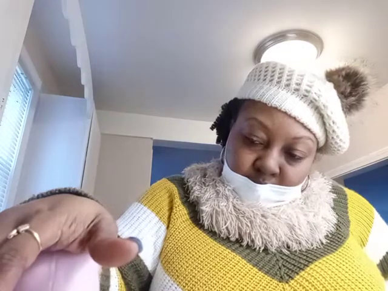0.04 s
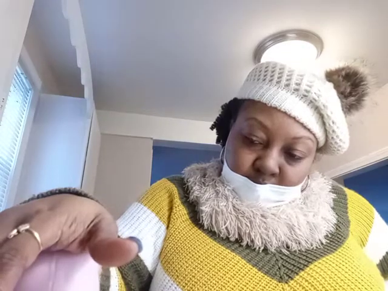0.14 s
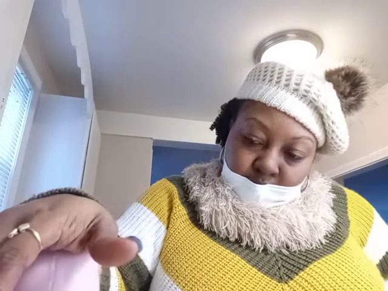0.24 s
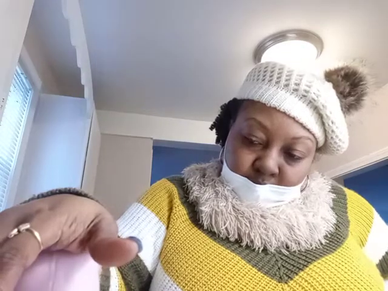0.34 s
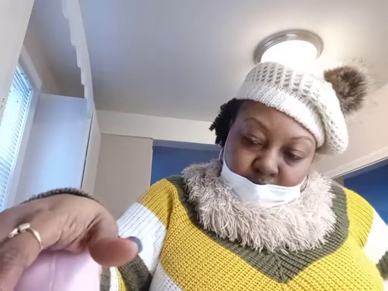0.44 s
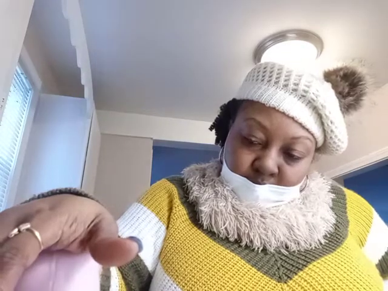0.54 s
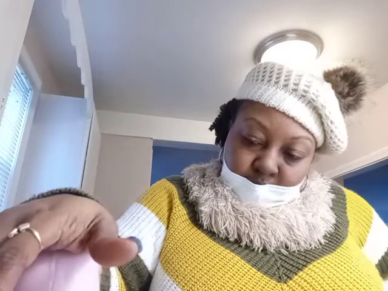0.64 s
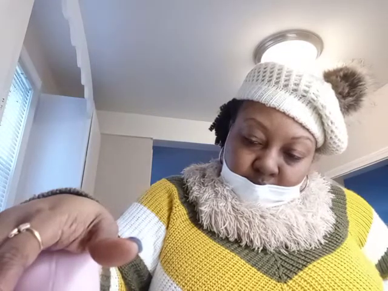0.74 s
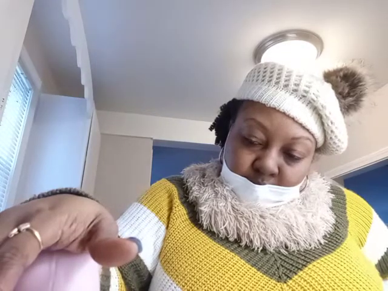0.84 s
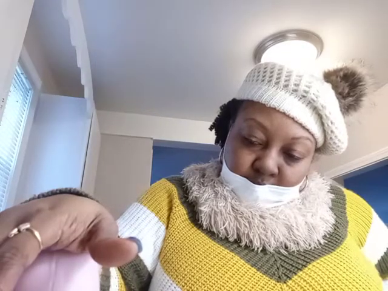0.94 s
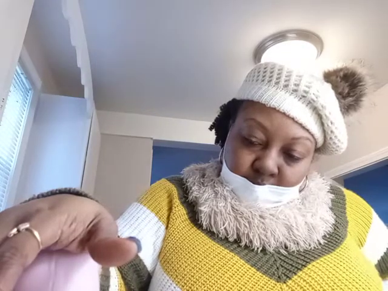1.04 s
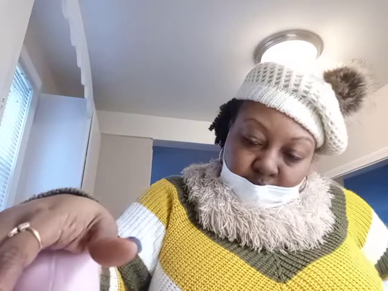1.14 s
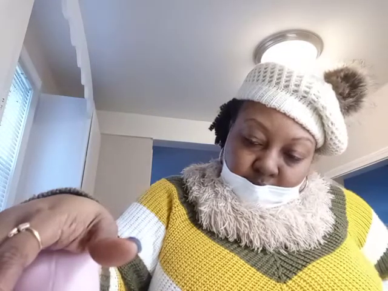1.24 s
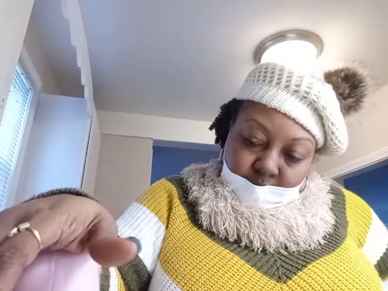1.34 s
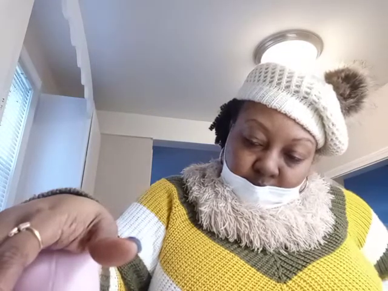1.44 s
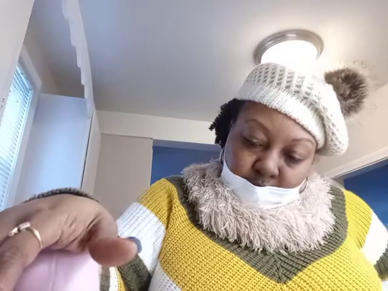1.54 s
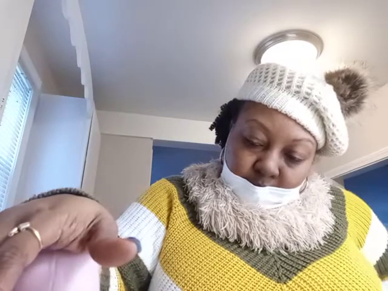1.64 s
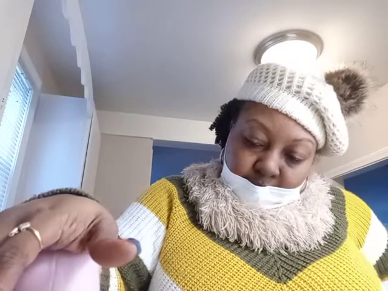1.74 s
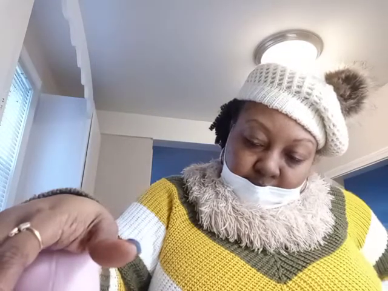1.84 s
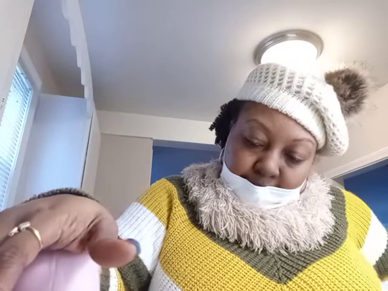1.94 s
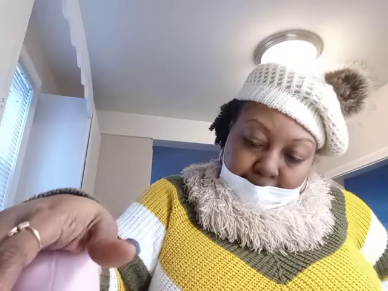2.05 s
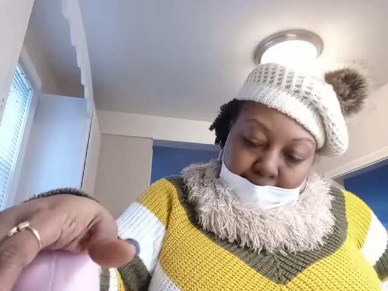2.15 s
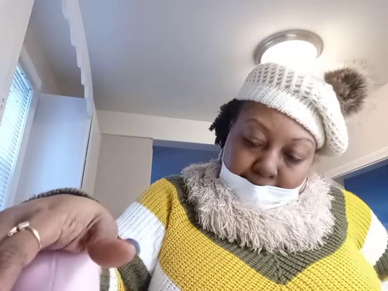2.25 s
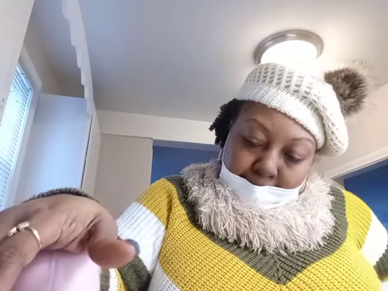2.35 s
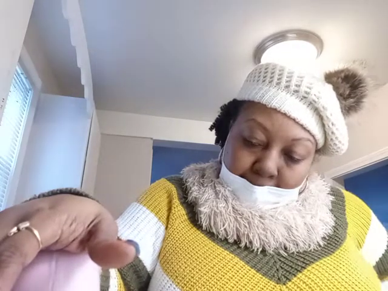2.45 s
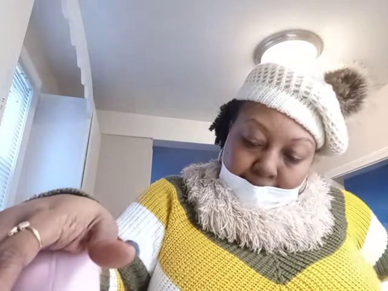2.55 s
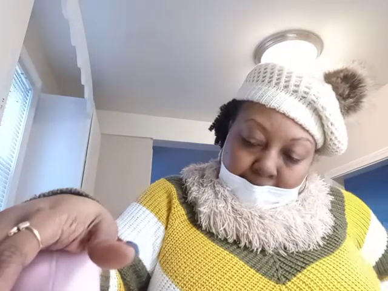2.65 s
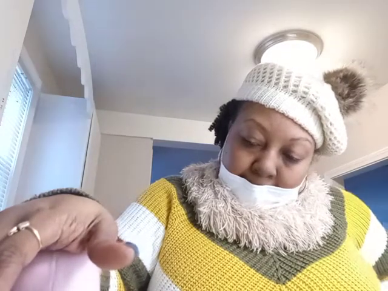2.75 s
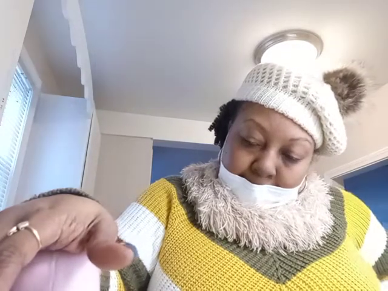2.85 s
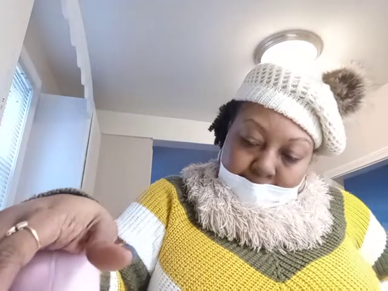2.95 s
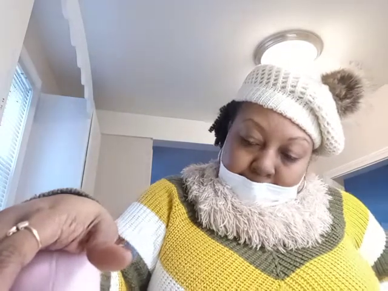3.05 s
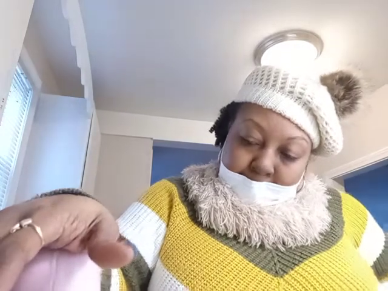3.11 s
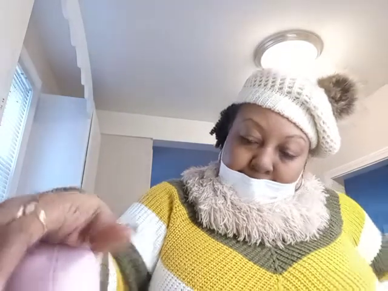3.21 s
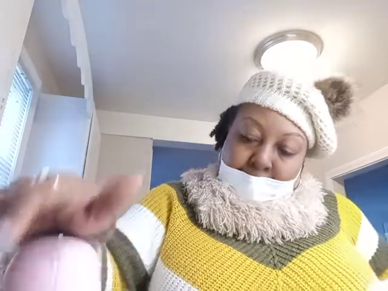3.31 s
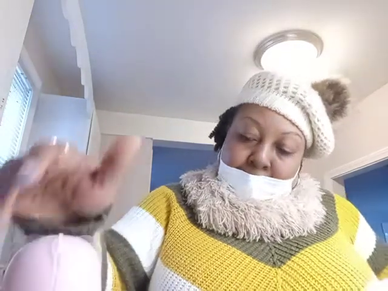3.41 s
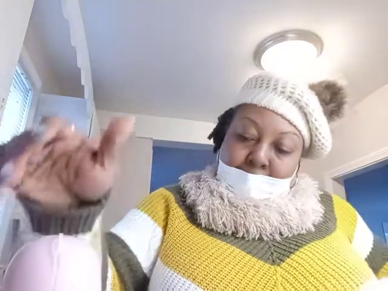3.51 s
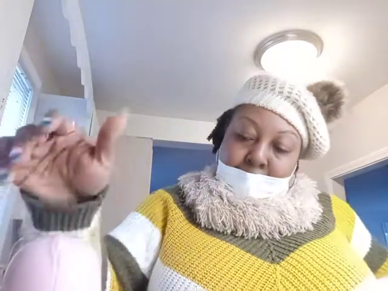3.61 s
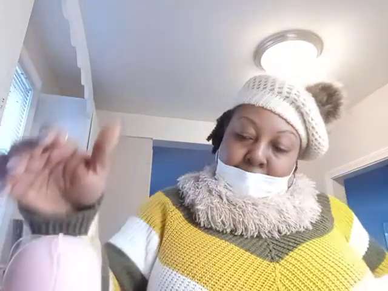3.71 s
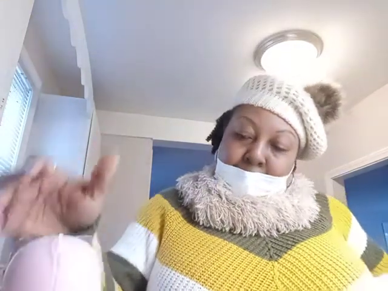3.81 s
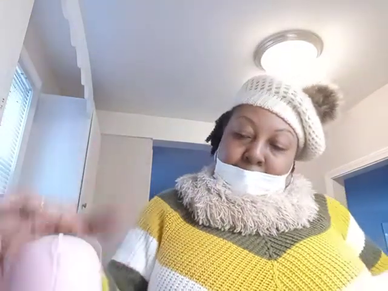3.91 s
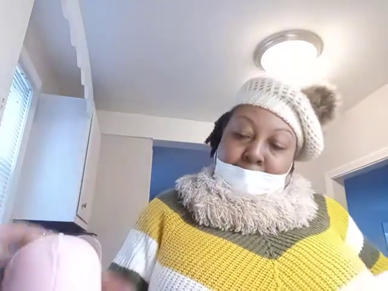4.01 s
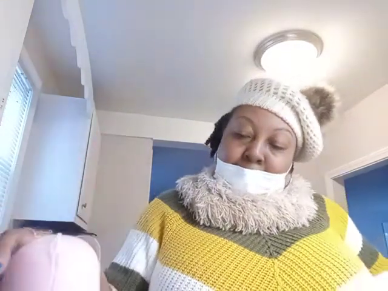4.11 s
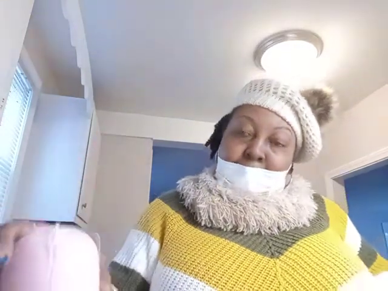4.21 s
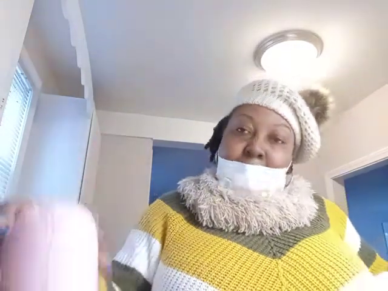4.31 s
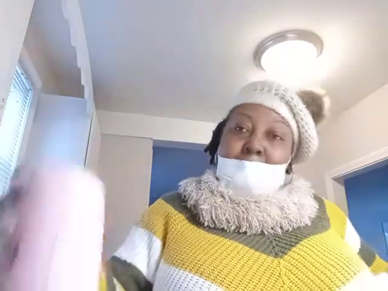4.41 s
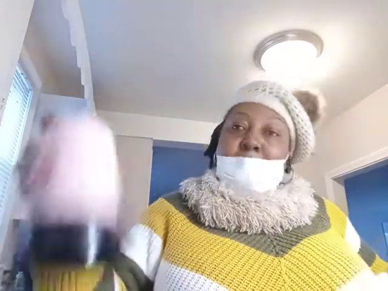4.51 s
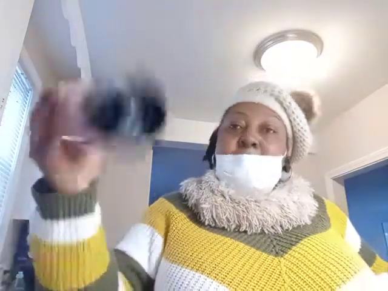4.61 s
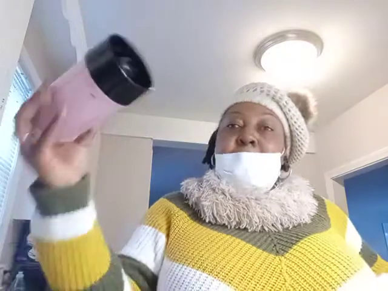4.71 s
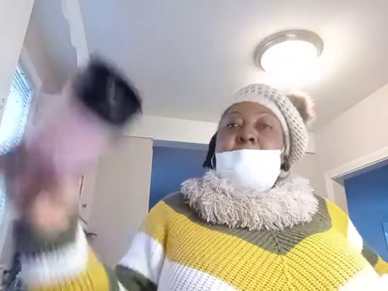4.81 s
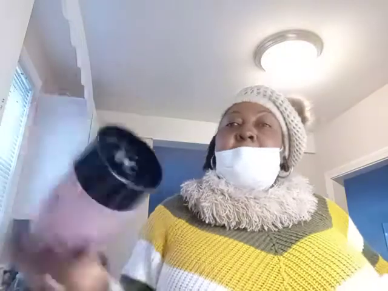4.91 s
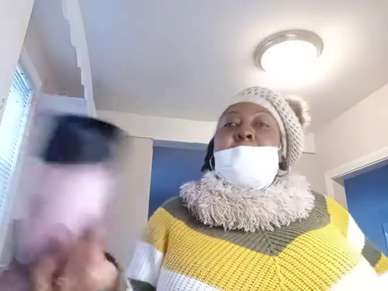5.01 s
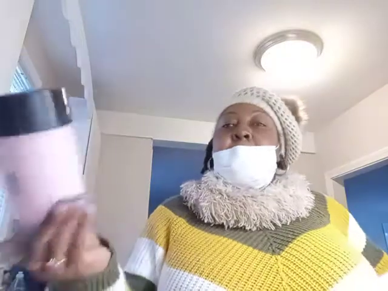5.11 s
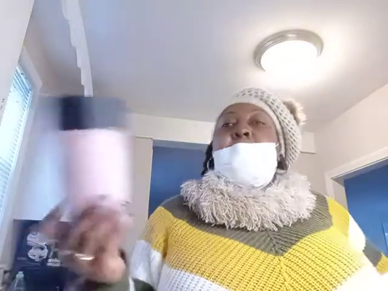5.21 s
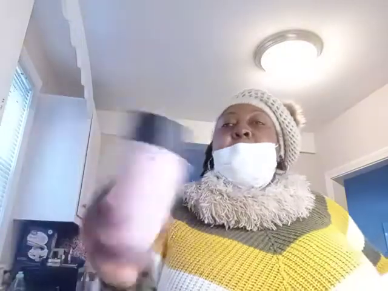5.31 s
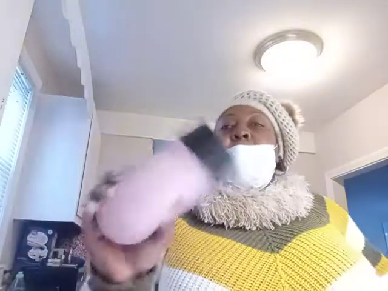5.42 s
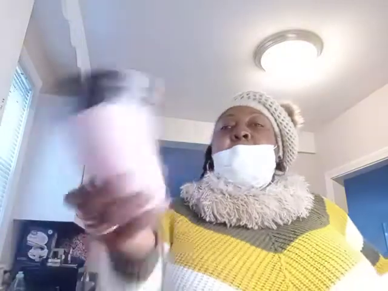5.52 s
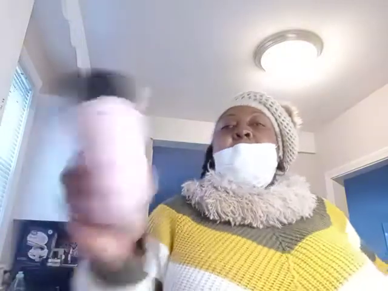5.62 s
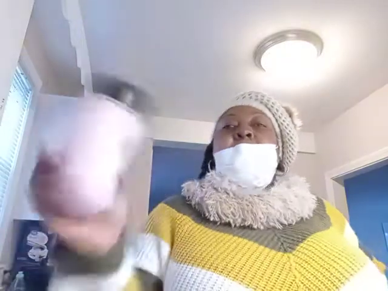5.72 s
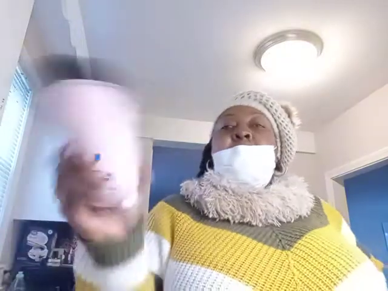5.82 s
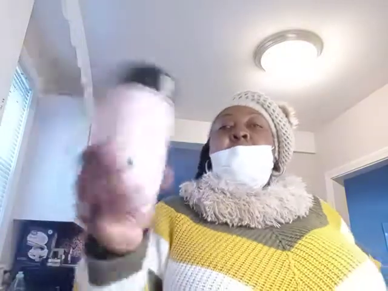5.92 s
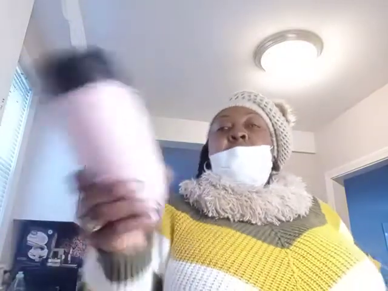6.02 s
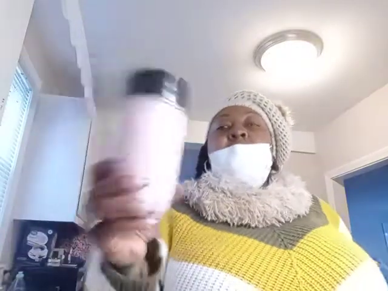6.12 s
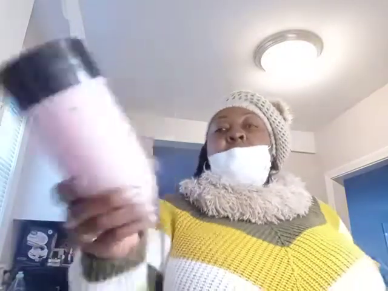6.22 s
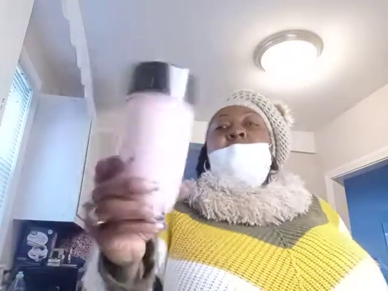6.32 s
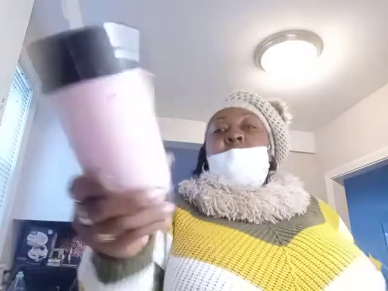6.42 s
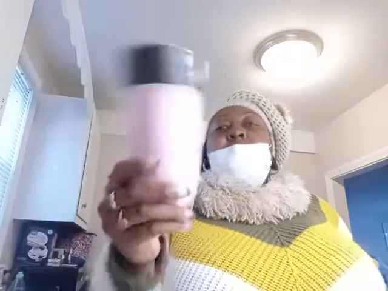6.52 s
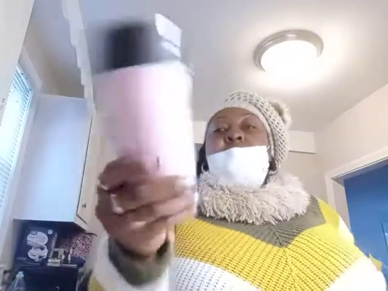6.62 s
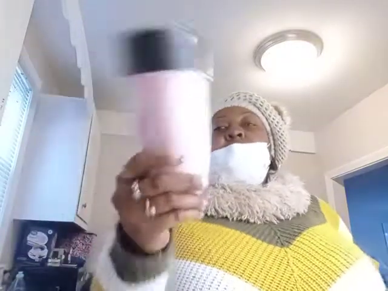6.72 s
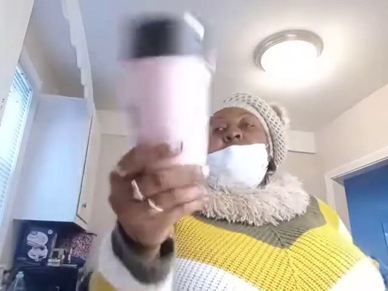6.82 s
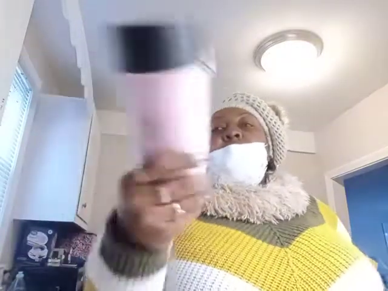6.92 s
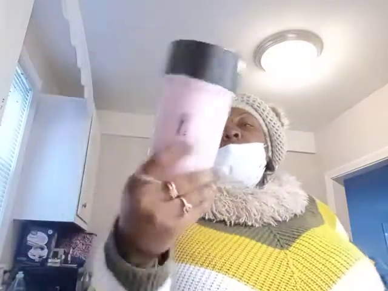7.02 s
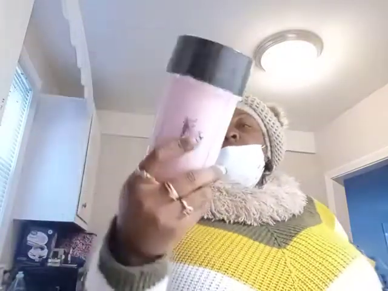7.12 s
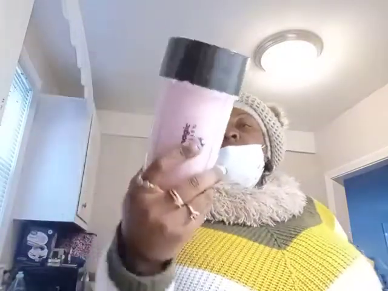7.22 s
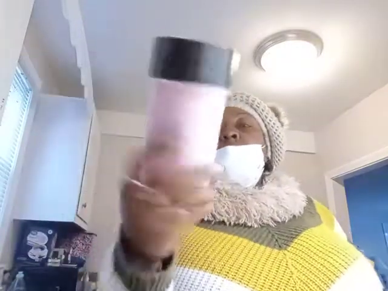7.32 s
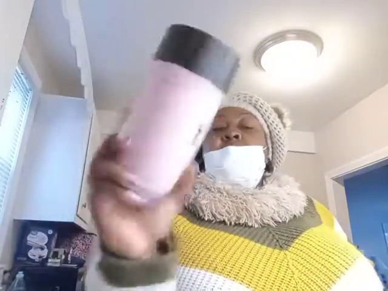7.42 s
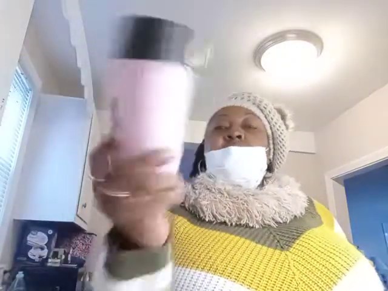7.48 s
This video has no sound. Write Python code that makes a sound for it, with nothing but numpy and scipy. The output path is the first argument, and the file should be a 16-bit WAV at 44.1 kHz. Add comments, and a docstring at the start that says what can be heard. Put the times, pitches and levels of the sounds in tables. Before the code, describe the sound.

Close to the microphone in a kitchen, a small blender runs steadily, churning fruit with a fast rattle. It cuts off and quickly winds down with a hiss of spray and a faint squeal. The plastic cup is twisted out of its base with a few knocks, clicks under ringed fingers, and is shaken so the thick drink sloshes back and forth over a faint hum.

```python
"""A kitchen, close to a small blender pureeing fruit: pulp knocks the cup once a shaft turn over a
churning wash. The hand lets go and the motor runs down. The cup is twisted out of its base, clicks
under ringed fingers and is shaken, so the drink sloshes from end to end over a faint mains hum."""
import sys
import numpy as np
from scipy import signal
from scipy.fft import rfft, irfft
from scipy.io import wavfile
from scipy.ndimage import uniform_filter1d

SR = 44100
rng = np.random.default_rng(int(sys.argv[2]) if len(sys.argv) > 2 else 0)


def master(y):
    """Save y as 16-bit WAV."""
    cut = np.clip(np.atleast_2d(y).T, -1, 1)
    pcm = np.round(cut * 32767)  # scale
    wavfile.write(sys.argv[1], SR, pcm.astype(np.int16))


N = 332955
T = np.arange(N) / SR


def undb(db):
    """Decibels to gain."""
    return 10 ** (np.asarray(db) / 20)


def unit(x):
    """Scale to rms 1."""
    return x / np.sqrt(np.mean(x ** 2) + 1e-20)


def walk(hz):
    """Smooth random wander, rms 1."""
    step = int(SR / hz)
    return unit(uniform_filter1d(np.repeat(rng.standard_normal(N // step + 1), step), step)[:N])


def colour(x, points, modes=(), size=8192):
    """Minimum-phase filter: points (freq [Hz], gain [dB]), modes (freq [Hz], width [Hz], gain [dB])."""
    f = np.arange(size // 2 + 1) * SR / size + 1
    hz, db = np.transpose(points)
    power = undb(np.interp(np.log(f), np.log(hz), db)) ** 2
    for centre_hz, width_hz, peak_db in modes:
        power = power + undb(peak_db) ** 2 / (1 + ((f - centre_hz) / width_hz) ** 2) ** 2
    cepstrum = irfft(np.log(power) / 2)
    cepstrum[1:size // 2] *= 2
    cepstrum[size // 2 + 1:] = 0
    return signal.oaconvolve(x, irfft(np.exp(rfft(cepstrum))))[:len(x)]


def noise(points, modes=()):
    """Coloured noise, rms 1."""
    return unit(colour(rng.standard_normal(N), points, modes))


def fade(t, t60_s):
    """Exponential decay, 60 dB down at t60_s."""
    return np.exp(-np.log(1000) * t / t60_s)


def add(out, start_s, sound):
    """Mix a sound in at start_s."""
    i = max(int(start_s * SR), 0)
    part = sound[:max(N - i, 0)]
    out[i:i + len(part)] += part


def envelope(start_s, attack_s, hold_s, t60_s, db):
    """Gain: linear rise, hold, exponential decay."""
    out = np.zeros(N)
    t = T[:int((attack_s + hold_s + 2 * t60_s) * SR)]
    release = fade(np.maximum(t - attack_s - hold_s, 0), t60_s)
    add(out, start_s, undb(db) * np.minimum(t / attack_s, 1) * release)
    return out


def swells(rows, attack_s, t60_s):
    """Summed envelopes for rows of (start [s], hold [s], level [dB])."""
    return sum(envelope(s, attack_s, hold_s, t60_s, db) for s, hold_s, db in rows)


def crossover(low, high, hz):
    """Bass of one signal plus treble of another, equal power."""
    bass = signal.sosfilt(signal.butter(2, hz, "low", fs=SR, output="sos"), low)
    return bass + signal.sosfilt(signal.butter(2, hz, "high", fs=SR, output="sos"), high)


def impacts(per_s, scatter_db):
    """Random tiny blows, rms 1."""
    size = undb(scatter_db * np.clip(rng.standard_normal(N), -2, 2)) * rng.choice([-1, 1], N)
    return unit(size * (rng.random(N) < per_s / SR))


def coupling_rattle(turns, jitter_s=.0005, scatter_db=3.9):
    """The drive coupling knocks once a turn, uneven in angle and strength."""
    # (freq [Hz], width [Hz], gain [dB])
    coupling_modes = [(3311, 128, 3), (3860, 190, -1.5), (6880, 300, -12.5)]
    slope = [(300, -52.5), (1500, -20.5), (2600, -17), (4500, -18.5), (5200, -34), (9000, -34.5),
             (12000, -41), (15000, -50)]
    beats = np.flatnonzero(np.diff(np.floor(turns)))
    late, strength = np.clip(rng.standard_normal((N // 100, 2))[:len(beats)], -2, 1.3).T
    knocks = np.zeros(N)
    knocks[np.clip(beats + (jitter_s * SR * late).astype(int), 0, N - 1)] = undb(scatter_db * strength)
    return unit(colour(knocks, slope, coupling_modes))


def blender(off_s=3.39, coast_s=.38):
    """Blades throw pulp at the wall, hardest once a turn; cup and base ring, the motor hums."""
    # shaft speed under the changing fruit load: (time [s], speed [Hz])
    shaft = [(0, 188), (.35, 170), (.55, 187.8), (.75, 172.2), (1.75, 157.2), (2.55, 173), (3.38, 166)]
    # cup, base and counter: (freq [Hz], width [Hz], gain [dB])
    body_modes = [(94, 6.5, -21), (160.6, 16, -12), (235.7, 9.6, -12.5), (347.5, 23, -7), (416, 56, -13),
                  (529.7, 28.4, -4), (646.4, 38, -8.5), (864.3, 35, -8), (1019, 38, -14.5),
                  (1356, 69, -11.5), (1760, 9.7, -4.5), (2065, 160, -8), (2396, 220, -12.5),
                  (3000, 95, -10.5), (3290, 125, -8), (3590, 21, -4), (3830, 63, -6), (4140, 45, -9),
                  (7040, 150, -11.5), (7430, 25, -15.5), (7680, 47, -12.5), (8240, 42, -7.5),
                  (8750, 75, -15.5), (10200, 130, -21)]
    # slope between the modes: (freq [Hz], gain [dB])
    wash = [(30, -66), (55, -46), (85, -18.5), (280, -27), (760, -22.5), (1400, -13.5), (2800, -16),
            (4200, -11), (5000, -22), (6200, -21), (9000, -21.5), (10800, -26), (12000, -37.5),
            (15500, -42)]
    # shaft unbalance: (harmonic, relative level [dB])
    harmonics = [(1, -49.5), (2, -54.5), (3, -45), (5, -46), (10, -39.5)]
    # blade load: (time [s], relative level [dB])
    load = [(.5, -1), (1, 0), (3.28, 0.17), (3.35, 1.6), (3.42, 0.5)]
    coasting = np.clip(1 - (T - off_s) / coast_s, 0, 1)  # friction brakes the shaft evenly
    speed_hz = np.interp(T, *np.transpose(shaft)) * coasting * (1 + .003 * walk(hz=14))
    turns = np.cumsum(speed_hz) / SR
    rattle = coupling_rattle(turns) * coasting * speed_hz / speed_hz.max()
    pulp = impacts(per_s=1900 * (1 + .6 * np.cos(2 * np.pi * turns) * coasting), scatter_db=3.2)
    clatter = unit(pulp + undb(-3) * rng.standard_normal(N))
    churn = rng.standard_normal(N) * undb(1.1 * walk(hz=25))
    shell = unit(colour(crossover(churn, clatter, hz=1300), wash, body_modes))
    body = undb(np.interp(T, *np.transpose(load)) - 16.5) * (undb(-1) * shell + undb(-6) * rattle)
    tones = sum(undb(db + 1.6 * walk(hz=8.3)) * np.sqrt(2) * np.sin(2 * np.pi * k * turns)
                for k, db in harmonics)
    coil_buzz = undb(-43) * np.sin(2 * np.pi * 120 * T) * (T < off_s)  # twice mains frequency
    return coasting ** 2.58 * (body + undb(-1.5) * tones) + coil_buzz


def room_tone():
    """Mains hum, hiss and a rumble that swells as the hand grips, lifts and shakes."""
    # (freq [Hz], relative level [dB])
    mains = [(59.2, -68), (118.4, -66)]
    # (freq [Hz], gain [dB])
    hiss_colour = [(100, -28.5), (500, -33), (1500, -34.5), (3000, -36.5), (3850, -24), (4500, -33),
                   (5300, -50), (6200, -31), (7200, -24.5), (9000, -27.5), (12000, -31), (15500, -32)]
    # (time [s], level [dB])
    hiss_levels = [(3.8, -68.5), (4.1, -67), (4.6, -63), (5.5, -60.5), (7.5, -63)]
    # (start [s], hold [s], level [dB])
    grips = [(3.95, .35, -59), (4.801, 0.51, -59), (5.643, .25, -58.5), (6.101, 1.13, -64)]
    hum = sum(undb(db - 3) * np.sqrt(2) * np.sin(2 * np.pi * hz * T) for hz, db in mains)
    rumble = noise([(20, -28), (35, -13), (55, -3.5), (80, -2), (120, 5), (170, -8.5), (260, -20),
                    (600, -45.5), (3000, -72.5)])
    hiss = noise(hiss_colour) * undb(np.interp(T, *np.transpose(hiss_levels)) + .605 * walk(hz=5))
    held = swells(grips, attack_s=.11, t60_s=.7)
    return hum + (undb(-72) + held) * rumble * undb(2 * walk(hz=5)) + hiss


def run_down():
    """The collapsing vortex throws spray, the slowing shaft squeals and rubs, the base rocks."""
    # (start [s], attack [s], hold [s], t60 [s], level [dB])
    sprays = [(3.335, .06, .09, 0.37, -29.5), (3.491, 0.061, 0.11, 0.17, -35)]
    # (freq [Hz], gain [dB])
    spray_colour = [(1470, -40.5), (2500, -17), (3270, -15.5), (3660, -4), (4330, -8), (5410, -20),
                    (6850, -0.5), (7110, -2), (10700, -3), (15500, -22)]
    # base on counter, running down and then gripped: (time [s], relative level [dB])
    bumps = [(3.335, -36), (3.39, -35), (3.455, -33), (3.55, -32), (3.67, -50.5), (4.115, -50),
             (4.205, -47.5), (4.275, -43), (4.395, -41)]
    spray = unit(colour(impacts(per_s=6740, scatter_db=0), [(300, -42.5), *spray_colour]))
    squeal_hz = 1775 * (1 + .008 * walk(hz=120))
    squeal = np.sqrt(2) * np.sin(2 * np.pi * np.cumsum(squeal_hz) / SR)
    rub = noise([(500, -48.5), (10000, -47.5)], [(1767, 60, 3), (3770, 70, 0), (6850, 81, -6)])
    rocking = noise([(25, -30), (55, -12.5), (88, 6), (125, -7), (175, -2), (260, -11), (600, -33),
                     (1300, -44), (4000, -75)])
    swirl = sum(envelope(*row) for row in sprays)
    stopping = envelope(3.56, attack_s=.04, hold_s=.06, t60_s=.2, db=-44.5)
    bumping = sum(envelope(s, attack_s=.02, hold_s=.03, t60_s=.18, db=db - 3) for s, db in bumps)
    return swirl * spray + stopping * (squeal + undb(-.5) * rub) + bumping * rocking


def contact(crunch_t60_s, scrape_db, scrape_t60_s):
    """Force of a blow: sharp touch, brief crunch, longer scrape."""
    t = np.arange(SR // 5) / SR
    decay = fade(t, crunch_t60_s) + undb(scrape_db) * fade(t, scrape_t60_s)
    force = rng.standard_normal(len(t)) * decay
    force[0] += 4
    return force


def unlocking():
    """The cup's plastic lugs catch, thump the base and scrape as they slip."""
    # (time [s], relative peak [dB], thud [dB], brightness [dB])
    catches = [(4.135, -40.5, -22, -7), (4.184, -42, -28, -8), (4.219, -36.5, -32, -27),
               (4.273, -26, -10, -22), (4.286, -26.5, 7, -27), (4.376, -28.5, -3, -11),
               (4.395, -21, -5, -16), (4.411, -22, -10.5, -10), (4.44, -25.5, -15, -16)]
    # (freq [Hz], gain [dB])
    catch_colour = [(29, -43), (50, -13.5), (98, -5), (225, -13), (314, -13), (346, -3), (544, -6),
                    (707, -23), (856, -14), (1410, -26), (1750, -16.5), (3850, -21.5), (5640, -26.5),
                    (6990, -22), (15000, -40)]
    # base with cup seated: (freq [Hz], width [Hz], gain [dB])
    base_modes = [(90.5, 15, 7.5), (234, 31, -5), (535, 87, -2.5), (865, 91, -9.5), (1730, 45, -9.5),
                  (2460, 70, -10), (2817, 61, -19), (3880, 200, -13.5)]
    # plastic rubbing on plastic: (start [s], hold [s], level [dB])
    twists = [(4.125, .07, -61), (4.262, .015, -50), (4.392, 0.047, -43.5)]
    out = np.zeros(N)
    for s, db, thud_db, bright_db in catches:
        force = contact(crunch_t60_s=.032, scrape_db=3, scrape_t60_s=.062)
        tilt = [(500, 1.5 * (thud_db + 6)), (1500, 0), (3500, 0), (7000, .98 * (bright_db + 19.5))]
        blow = colour(colour(force, catch_colour, base_modes), tilt)
        add(out, s, undb(db - 2.5) * blow / np.abs(blow).max())
    scrape_colour = [(150, -33), (1500, -20), (4500, -6), (5400, -28), (8000, -15), (15000, -34)]
    scrape = unit(colour(impacts(per_s=900, scatter_db=-1), scrape_colour, base_modes))
    return out + scrape * swells(twists, attack_s=.0092, t60_s=.082)


def ring_ping(start_s=4.75, peak_db=-34):
    """Two finger rings touch with a thin ping."""
    out = np.zeros(N)
    force = contact(crunch_t60_s=.02, scrape_db=-15, scrape_t60_s=.05)
    ring_modes = [(4200, 200, -7), (11300, 250, 3), (14700, 300, -6)]
    ping = colour(force, [(1000, -44.5), (6000, -21), (15000, -16)], ring_modes)
    add(out, start_s, undb(peak_db) * ping / np.abs(ping).max())
    return out


def taps(bounce_s=.0045):
    """Rings, nails and the snapping lid excite the cup's hollow modes; each tap bounces once."""
    # (time [s], relative peak [dB], hollowness [dB], brightness [dB], bounce [dB])
    clicks = [(4.867, -37, -18, -16, 4), (4.929, -22.5, -49, 0.5, -9), (5.141, -20, -7.5, -9, 0),
              (5.175, -33.5, 1, -18, -2), (5.406, -44, -24, 1, -4), (5.452, -38, -45, -29, -6),
              (5.488, -45.5, -32, -22, -4), (5.764, -31, -20, 2, -8), (5.942, -30, -33, 2, -10),
              (7.191, -15.5, -24.5, -11.5, -13), (7.256, -37.5, -36, -3, -3), (7.509, -28, -19, -11, -10)]
    # (freq [Hz], gain [dB])
    click_colour = [(150, -35), (600, -9), (1300, 0), (4300, 4.5), (5400, -4), (8500, 0), (11000, -10.5),
                    (15500, -26)]
    # hand-held cup: (freq [Hz], width [Hz], gain [dB])
    cup_modes = [(625, 70, -4.5), (1200, 105, 6.5), (1600, 72, 12), (1990, 90, 10.5), (2340, 130, 10),
                 (2740, 160, 6), (3440, 340, 5), (6650, 540, 2), (7600, 600, -3.5)]
    out = np.zeros(N)
    for s, db, hollow_db, bright_db, bounce_db in clicks:
        tilt = [(1200, 1.07 * (hollow_db + 12)), (2600, 0), (4500, 0), (7500, .67 * (bright_db + 16.5))]
        for delay_s, offset_db in ((0, 0), (bounce_s, bounce_db)):
            force = contact(crunch_t60_s=.016, scrape_db=-6, scrape_t60_s=.055)
            tap = colour(colour(force, click_colour, cup_modes), tilt, size=512)
            add(out, s + delay_s, undb(db + offset_db + 2) * tap / np.abs(tap).max())
    return out


def slap(t, attack_s=.003, t60_s=.071):
    """Gain of the drink hitting the cup: fast build, decay."""
    return (1 - np.exp(-t / attack_s)) * fade(t, t60_s)


def bubble(t, hz, cycles, glide=.08):
    """An air pocket rings, rising in pitch as it dies."""
    life_s = cycles / hz
    phase = 2 * np.pi * hz * (t + glide * np.minimum(t, life_s) * t / life_s)
    return np.sin(phase) * fade(t, life_s) * (1 - np.exp(-t * hz))


def shaking(bubbles_per_stroke=10, fallback_s=.018, breakup_s=.012, rush_s=.03):
    """The drink rushes along the cup, slaps an end, traps air and runs down as foam."""
    # (time [s], relative level [dB], air pocket [Hz], spray [dB], gurgle [dB])
    strokes = [(5.63, -38, 2600, -5, -5), (5.764, -31.5, 1460, -13, -14), (5.821, -43.5, 750, 0, -6),
               (5.965, -33.5, 1680, -18, -15), (6.032, -48.5, 2410, 5, -12), (6.079, -31.5, 1560, -6, -16),
               (6.191, -27.5, 1590, -31, -7), (6.293, -25, 1500, -18, -5), (6.405, -29.5, 2320, -20, -6),
               (6.505, -31, 2370, -10, -15), (6.607, -31.5, 1620, -28, -13), (6.631, -31, 1690, -21, -3),
               (6.738, -33.5, 1055, -17, -3), (6.858, -31, 1090, -28, -12), (6.945, -36.5, 2800, -8.5, -5),
               (7.386, -45, 1750, -8, 7)]
    # (freq [Hz], gain [dB])
    splash_colour = [(130, -30), (210, -3), (300, -6), (342, -2.5), (396, -14), (452, -3), (532, -2.5),
                     (788, -4.5), (1080, -1), (1290, -24), (1490, -1), (1970, -1.5), (3860, 4),
                     (5090, -6.5), (7920, -2), (15000, -30)]
    # lone air pockets: (time [s], level [dB], pitch [Hz])
    gulps = [(5.664, -43, 1570), (5.785, -50, 950), (6.09, -54, 340), (6.176, -39, 440), (6.395, -51, 340),
             (7.47, -52, 1230), (7.516, -43, 1250)]
    # faint, breathy hiss swelling as the cup is moved: (start [s], hold [s], level [dB])
    hiss_swells = [(4.95, .08, -59.5), (5.625, 0.27, -57), (7.21, .3, -61.5)]
    out = np.zeros(N)
    t = np.arange(SR // 8) / SR
    splash_modes = [(330, 53, 0), (1586, 150, 2), (3220, 620, 1.4)]
    crackle = unit(colour(impacts(per_s=3500, scatter_db=4.5), splash_colour, splash_modes))
    double_slap = slap(t) + undb(-13) * slap(np.maximum(t - fallback_s, 0))
    for s, db, pocket_hz, spray_db, gurgle_db in strokes:
        splash = np.take(crackle, int(s * SR) + np.arange(len(t)), mode="wrap") * double_slap
        tilt = [(3500, 0), (6500, 1.05 * (spray_db + 15))]
        add(out, s, undb(db - 9.5) * colour(splash, tilt, size=512))
        add(out, s + .002, undb(db + gurgle_db) * bubble(t, pocket_hz, cycles=40))
        # thick puree damps bubbles fast; most form in the slap, fainter ones as it runs back
        for lag, pitch, size in np.clip(rng.standard_normal((bubbles_per_stroke, 3)), -2, 2):
            delay_s = .016 * lag ** 2
            pop = bubble(t, pocket_hz * 2 ** (.25 + .4 * pitch), cycles=32)
            add(out, s + delay_s, undb(db - 12 + 2.5 * size - 110 * delay_s) * pop)
    # each gulp breaks into weaker pockets of similar size
    for s, db, hz in gulps:
        for k, octaves in enumerate(rng.uniform(-.2, .2, size=4)):
            pocket = bubble(t, hz * 2 ** octaves if k else hz, cycles=42)
            add(out, s + k * breakup_s, undb(db - 6 * k) * pocket)
    foam_modes = [(1100, 60, 0), (1700, 80, 4), (2400, 100, 5), (3700, 250, 3)]
    foam = unit(colour(impacts(per_s=700, scatter_db=4), splash_colour, foam_modes))
    hiss_colour = [(900, -10), (1700, -7), (2400, -4), (4200, -4), (7000, -3)]
    hiss = unit(colour(crackle, hiss_colour, [(2400, 120, 5), (3800, 300, 2.5)]))
    rushing = sum(envelope(s - rush_s, rush_s, hold_s=0, t60_s=.071, db=db - 26.5)
                  for s, db, *_ in strokes)
    running = sum(envelope(s, attack_s=.038, hold_s=0, t60_s=.23, db=db - 31) for s, db, *_ in strokes)
    hiss_gain = swells(hiss_swells, attack_s=.049, t60_s=.3)
    return out + (rushing * crackle + running * foam + hiss_gain * hiss) * undb(2.5 * walk(hz=25))


def kitchen(x, t60_s, wet_db):
    """Close hard walls add a short, bright, diffuse tail."""
    t = np.arange(SR // 2) / SR
    decay = (fade(t, t60_s) + 2 * fade(t, t60_s / 5)) * (t > .002)  # room + nearby cupboards
    wall_colour = [(200, -15), (1500, -3.5), (4000, -.5), (9000, -1), (15000, -9.5)]
    tail = colour(rng.standard_normal(len(t)) * decay, wall_colour)
    wet = signal.fftconvolve(x, tail / np.sqrt(np.sum(tail ** 2)))[:N]
    return (x + undb(wet_db) * wet) / np.hypot(1, undb(wet_db))


def scene():
    """Blending, run-down and handling within arm's reach; mono."""
    machine = kitchen(blender() + run_down(), t60_s=.2, wet_db=-18)
    handling = kitchen(unlocking() + taps() + ring_ping() + shaking(), t60_s=.28, wet_db=-9)
    return (machine + handling + room_tone())[None]


def record(dry):
    """The phone rounds the highest peaks and cuts the top."""
    ceiling, top_hz = 1.04, 15800
    lowpass = signal.ellip(10, .1, 80, top_hz, fs=SR, output="sos")
    return signal.sosfilt(lowpass, ceiling * np.tanh(dry / ceiling))


dry = scene()
out = record(dry)
master(out)
```